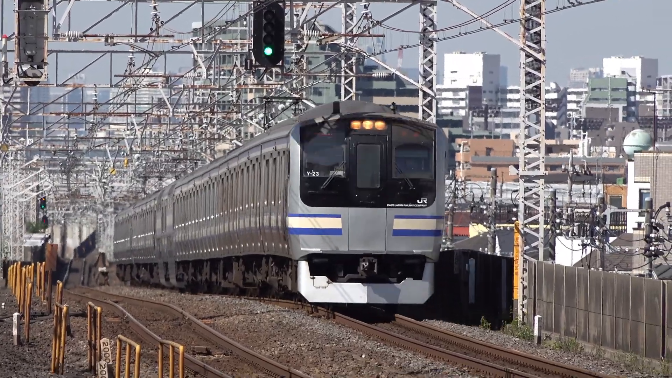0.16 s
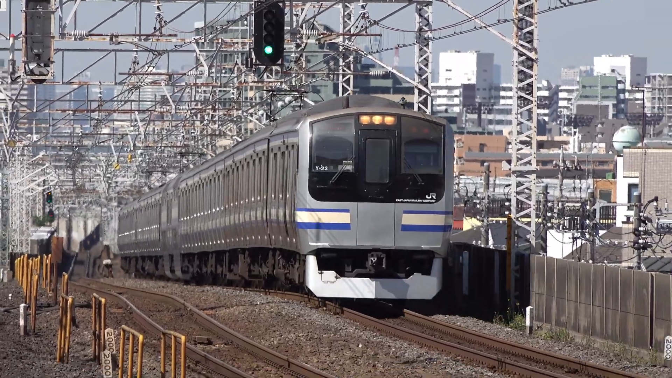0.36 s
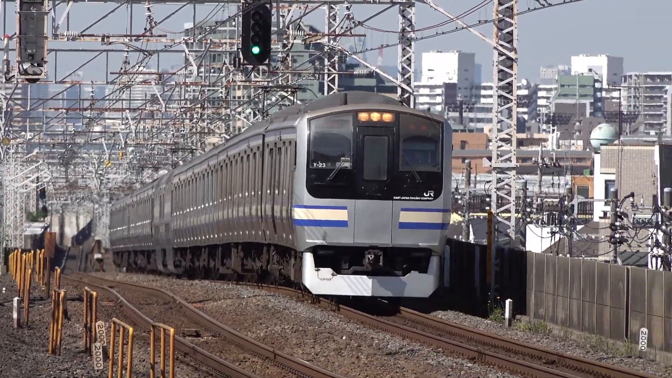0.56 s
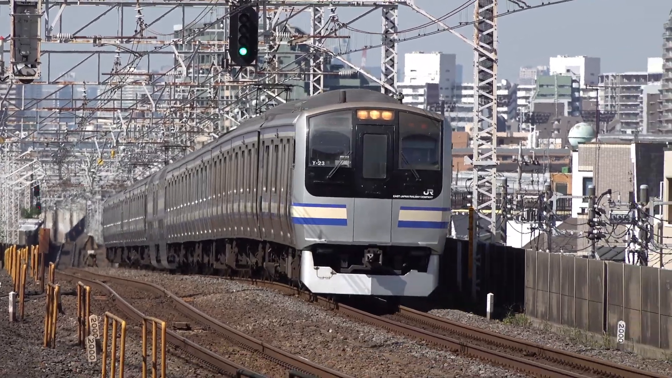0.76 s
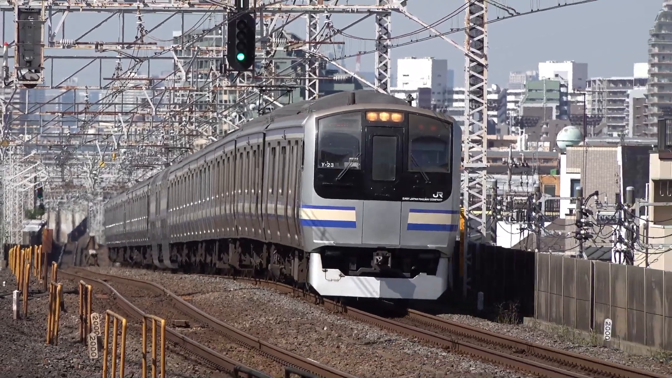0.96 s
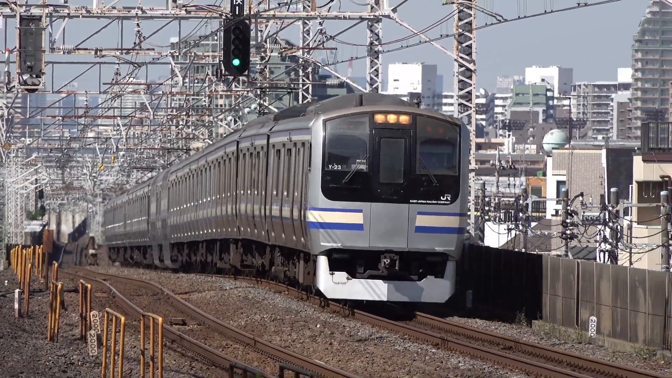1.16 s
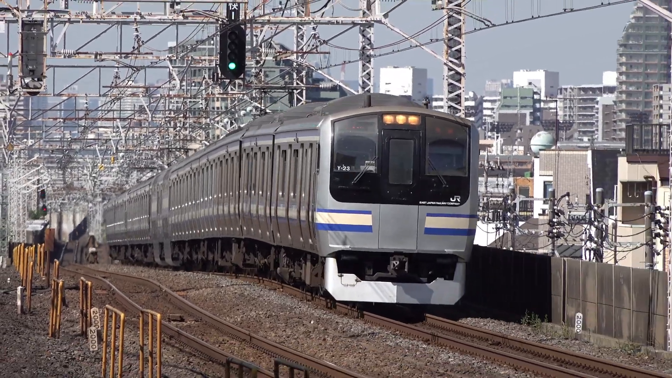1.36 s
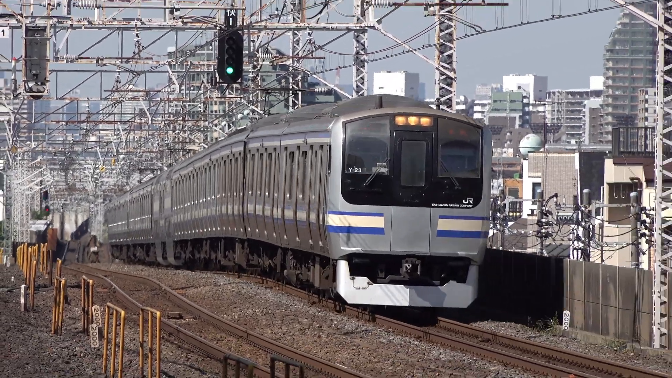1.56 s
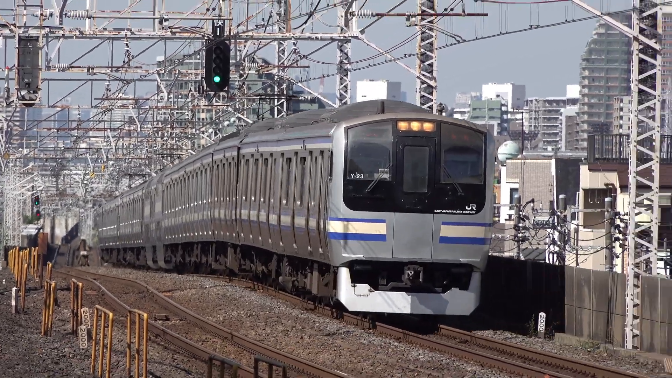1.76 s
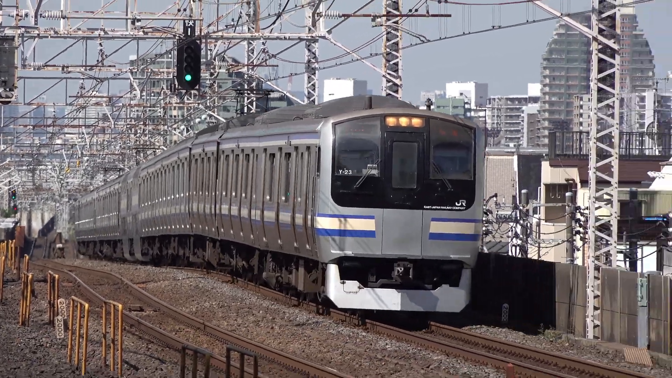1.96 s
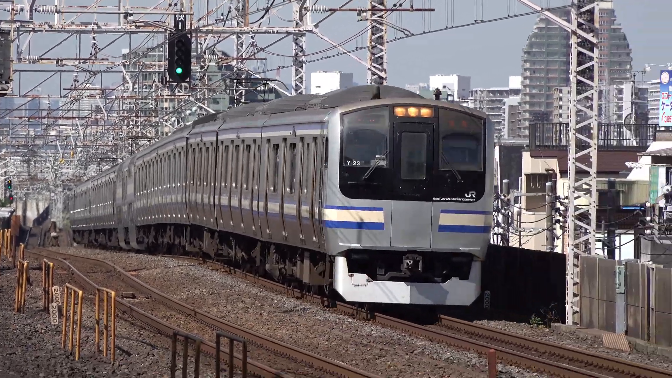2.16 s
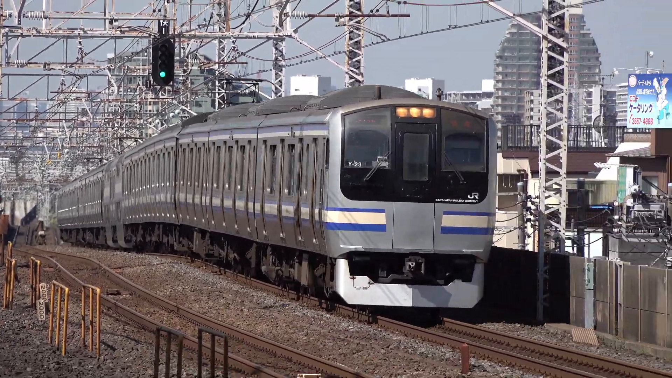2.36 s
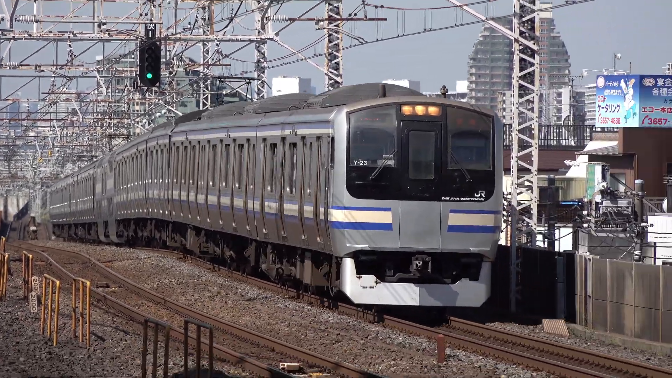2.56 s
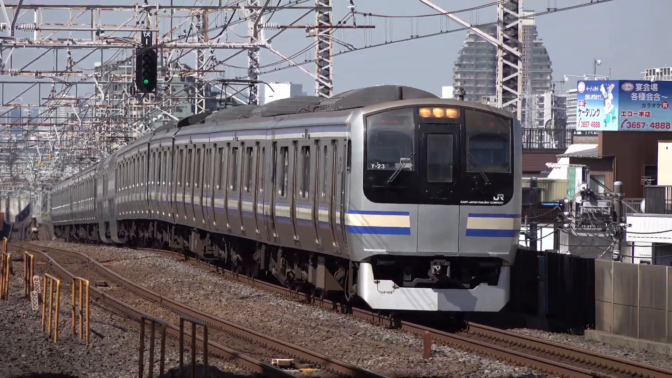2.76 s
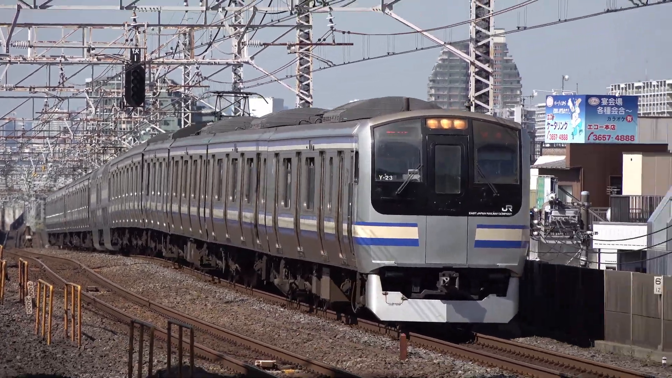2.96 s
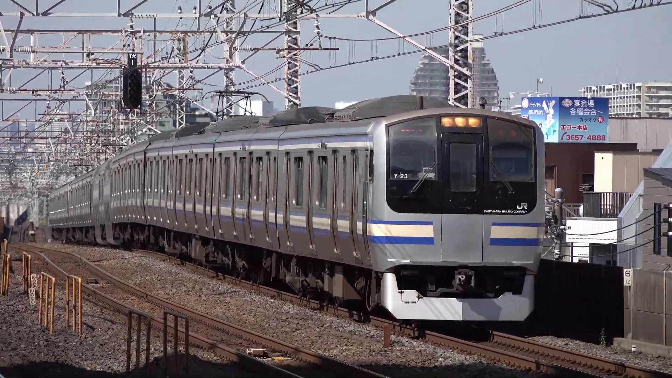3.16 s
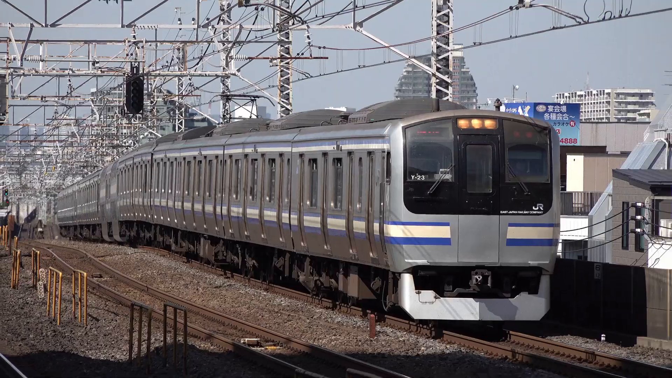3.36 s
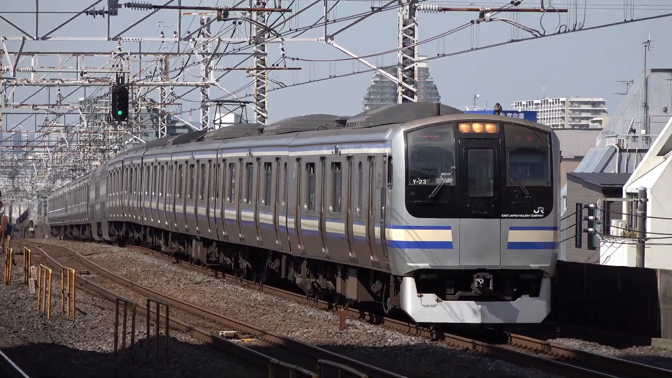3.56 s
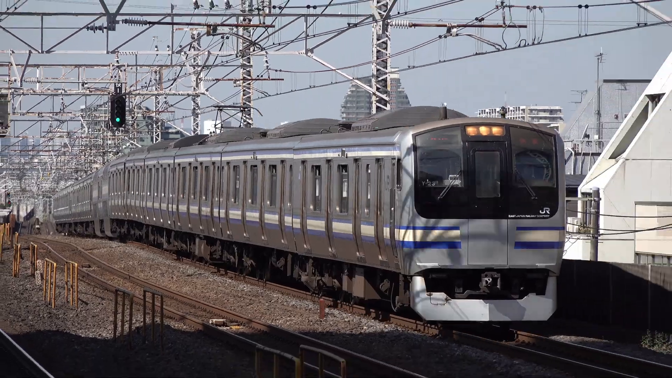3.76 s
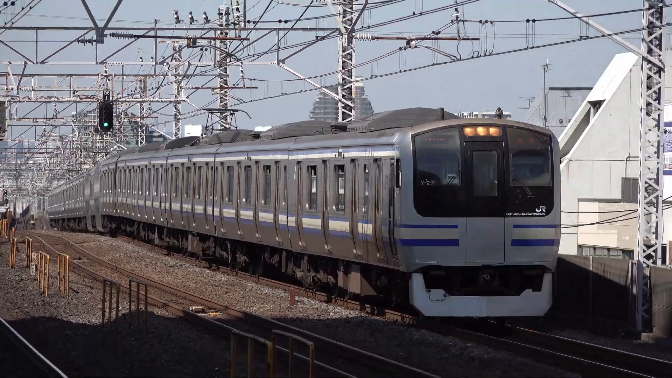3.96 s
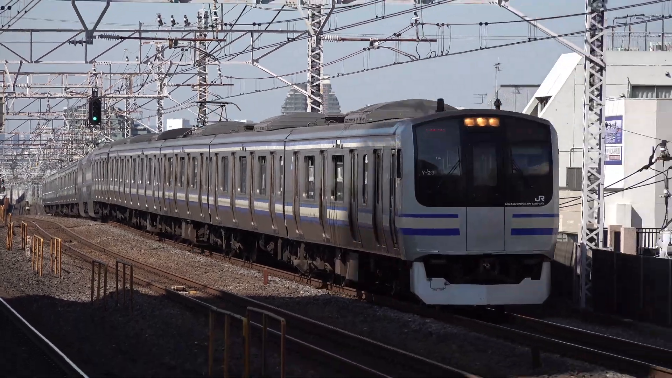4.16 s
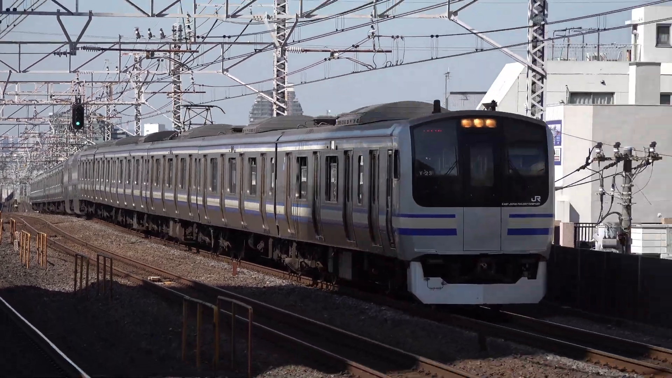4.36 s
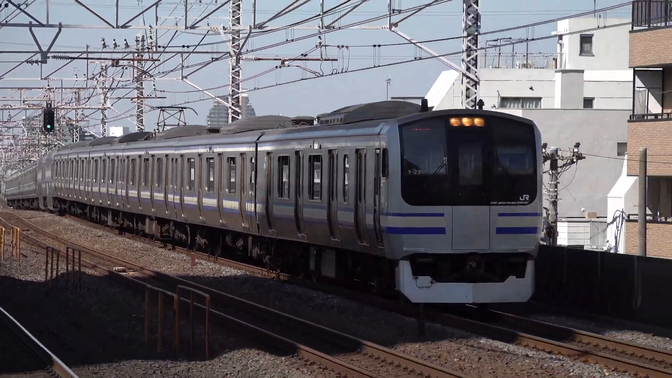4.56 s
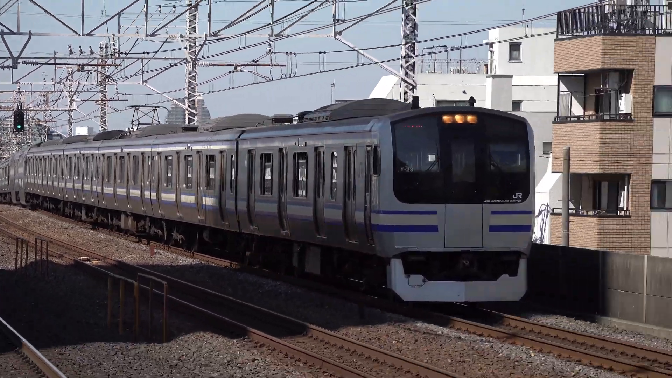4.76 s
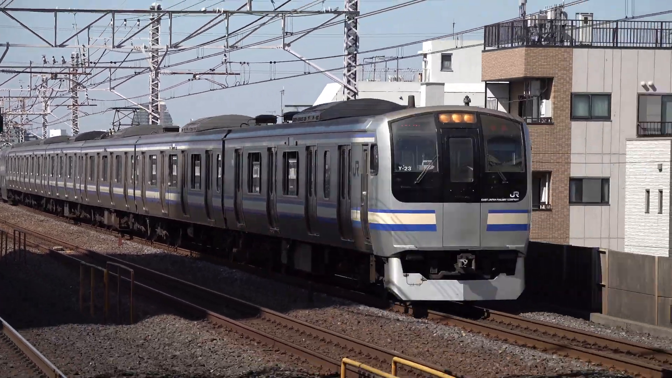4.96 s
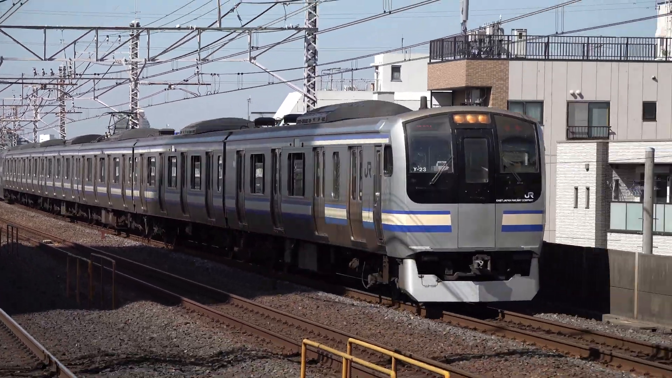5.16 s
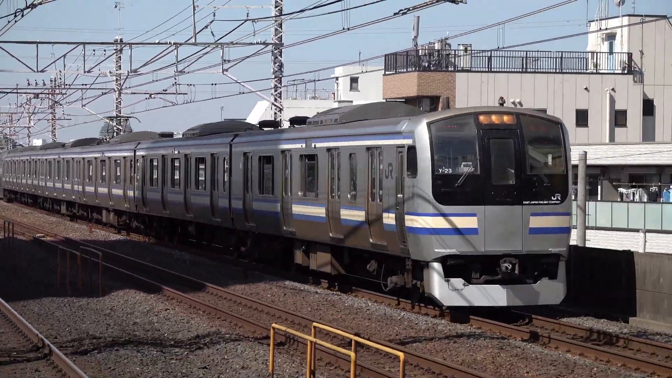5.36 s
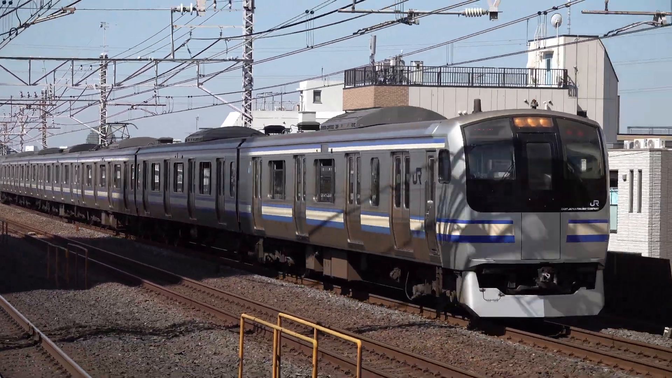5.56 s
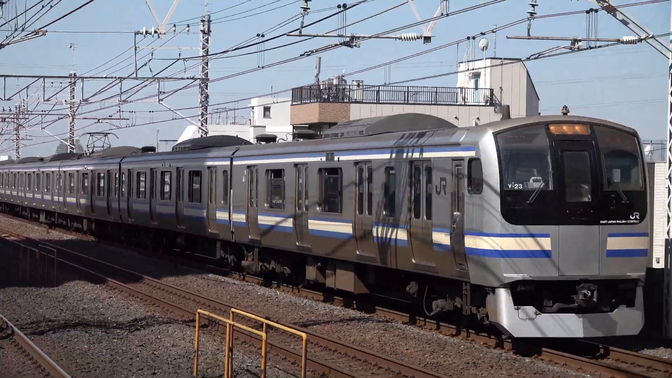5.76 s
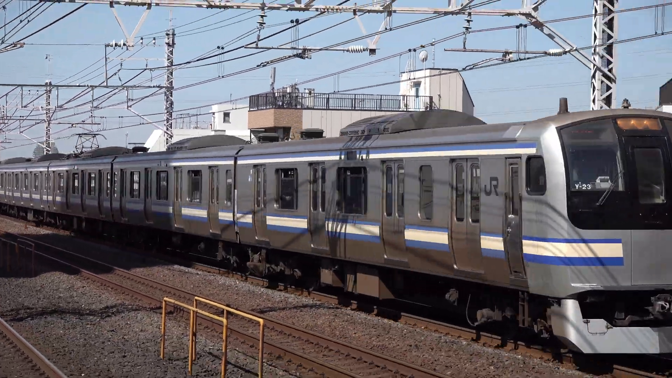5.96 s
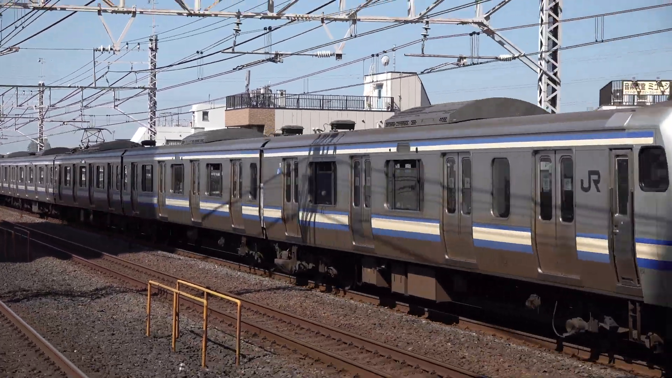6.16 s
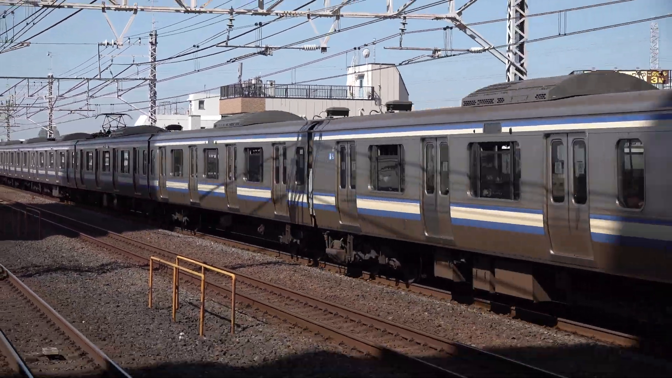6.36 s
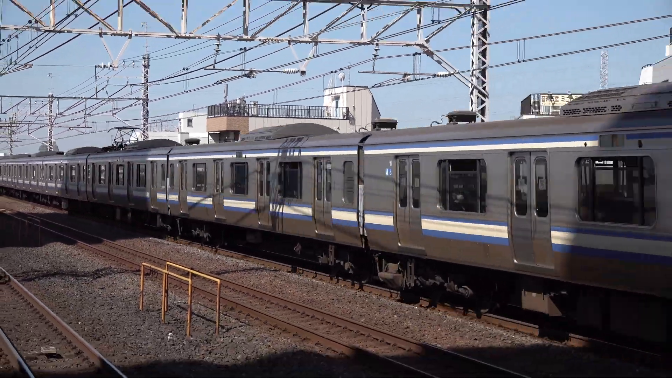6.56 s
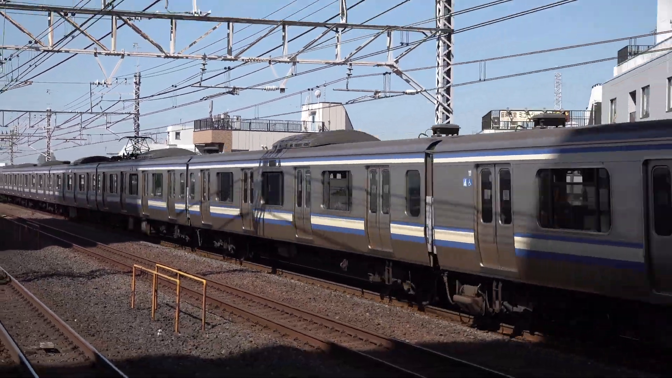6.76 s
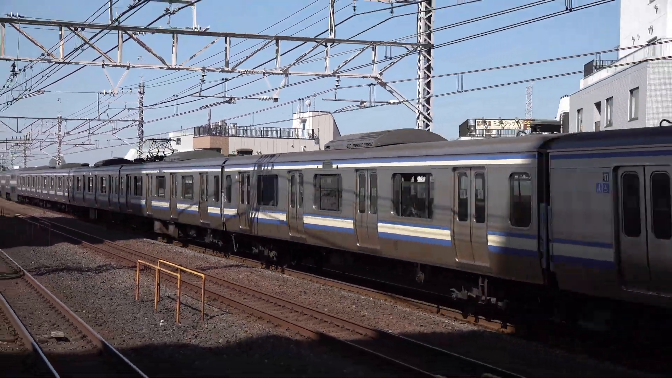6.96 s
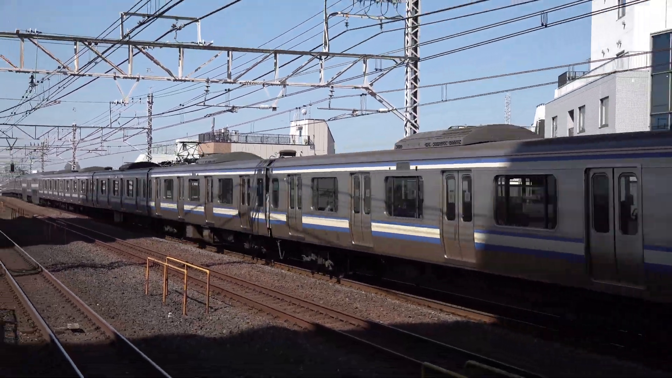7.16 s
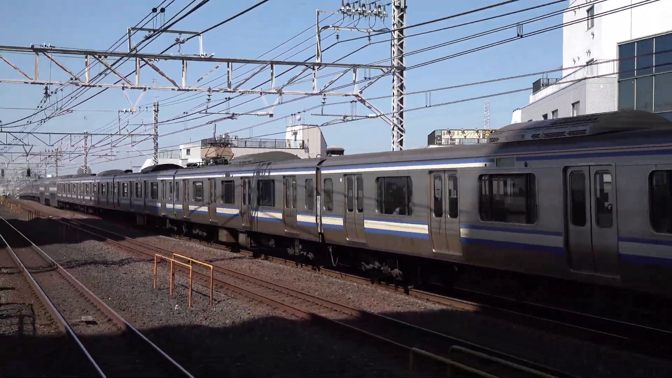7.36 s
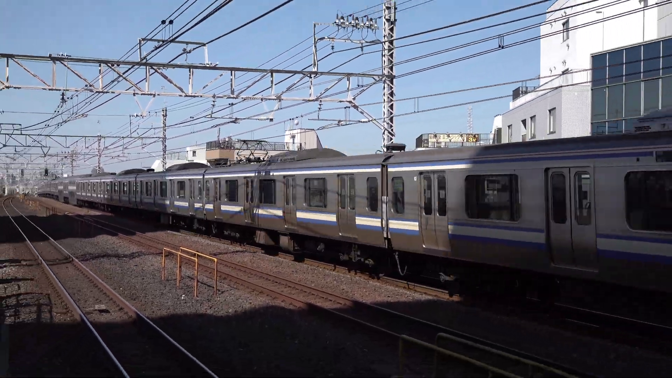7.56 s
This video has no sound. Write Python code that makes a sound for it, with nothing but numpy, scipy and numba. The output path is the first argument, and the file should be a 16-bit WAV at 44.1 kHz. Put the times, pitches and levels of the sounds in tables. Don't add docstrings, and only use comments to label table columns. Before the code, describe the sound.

In the open air beside a railway, low town rumble, a faint machine hum and distant rail singing begin quietly, with tiny bright taps around 0.5 seconds and a soft low knock at 1.3. Near 1.9 seconds a close camera starts a sharp, metallic burst, about seven clacks a second, lasting until roughly 3.35. From 2.7 to 3.5 a duller camera clatters faster, about twelve a second, overlapping it. Low bumps on the platform cluster around 3.3 to 3.5. With the shutters silent, the approaching electric train grows through 4 to 6 seconds, wheels ringing tonally above rolling roar and hiss. Around 6.7 its nose passes with a deep swell of air, and the ringing slides downward as successive bogies pass. It stays loud and close, leaning right, until the end at about 7.7.

```python
import sys
import numpy as np
from scipy import signal
from scipy.io import wavfile
from numba import njit

SR = 44100
rng = np.random.default_rng(int(sys.argv[2]) if len(sys.argv) > 2 else 0)


def volts(x):
    e = np.asarray(x, float) / 20
    return 10 ** e


def wav_out(sig):
    wavfile.write(sys.argv[1], SR, np.round(np.clip(np.atleast_2d(sig).T, -1, 1) * 32767).astype(np.int16))


N = 339129
TIME = np.arange(N) / SR
SLOW = TIME[::32]
STRIKE = np.arange(1200) / SR


def full(slow):
    return np.interp(TIME, SLOW, slow)


def walk(rate):
    return np.interp(SLOW * rate, np.arange(4000), rng.standard_normal(4000))


def read(table, hz):
    table = np.array(table)
    return np.interp(np.log(hz), np.log(table[:, 0]), table[:, 1])


def crossfade(hz, edges_hz, values):
    return np.interp(np.log(hz), np.log(edges_hz), values)


@njit
def svf(x, hz, width):
    y, b, l = np.empty(len(x)), 0., 0.
    g, k = np.tan(np.pi * hz / SR), width / hz
    for i in range(len(x)):
        v = (b + g * (x[i] - l)) / (1 + g * (g + k))
        b, l, y[i] = 2 * v - b, l + 2 * g * v, k * v
    return y


def band(x, hz, width):
    hz, width = float(hz), float(width)
    return svf(svf(x, hz, width), hz, width)


# time in seconds, nearness in dB below the level alongside,
# depth of the long ripples under it in dB, left minus right in dB.
APPROACH_PATH = [(0.0, -37, 16, 1), (0.9, -30, -7, 1), (1.8, -28, 1.5, 1), (2.7, -24.5, 1, 1.5),
                 (3.6, -20, -4.5, .5), (4.2, -17.5, -3.5, .4), (4.7, -15, -4.5, 0.5),
                 (5.1, -12.5, 2.5, 0.7), (5.5, -11, 5.5, 0.5), (6.0, -8, 3.5, 0.5), (6.35, -3.5, -5, -.3),
                 (6.55, -2.5, -1.5, -1), (6.7, -2.5, 6, -2.5), (6.9, -1, -2.5, -2.5),
                 (7.15, -0.1, -3, -2.6), (7.33, -0.8, 2, -2.5), (7.5, -0.5, 1, -2), (7.69, -1.5, 1, -3)]


def approach():
    s, *columns = np.transpose(APPROACH_PATH)
    return [np.interp(SLOW, s, column) for column in columns]


def law(rule):
    return rule[0] + rule[1] * approach()[0]


def nose():
    peak_s, rise_s, fall_s = 6.7, 0.57, 0.32
    late = SLOW - peak_s
    return np.exp(-(late / np.where(late < 0, rise_s, fall_s)) ** 2)


# frequency in Hz, correlation of left and right from 0 to 1.
LIKENESS = [(30, .97), (110, 0.94), (250, 0.89), (700, 0.91), (1400, 0.82), (3000, 0.81), (5000, 0.95),
            (8000, 0.041), (11000, 0.28), (15000, 0.71)]


def side_gain(hz):
    alike = np.clip(read(LIKENESS, hz), 0, 1)
    return np.sqrt((1 - alike) / (1 + alike))


def bass_spread(share):
    far_db, opens_s, open_s = -20.5, 6.32, 0.14
    return full(volts(share * far_db / (1 + np.exp((SLOW - opens_s) / open_s))))


def add(x, s, db, ring_ms, chatter):
    i = int(s * SR)
    decay = np.exp(-STRIKE * 1000 * np.log(1000) / ring_ms)
    rise = 1 - np.exp(-STRIKE / .0004)
    x[i:i + len(STRIKE)] += volts(db) * decay * rise * chatter


def body(x, modes):
    return sum(volts(db) * band(x, hz, 1.27 * width) for hz, width, db in modes)


def beside(x, pan_db, lag_ms, wet_db):
    tail = rng.standard_normal((2, len(STRIKE))) * np.exp(-STRIKE / 0.0067)
    wet = signal.fftconvolve(x[None], tail, axes=1)[:, :N]
    late = np.interp(TIME - lag_ms / 1000, TIME, x)
    direct = np.array([x * volts(pan_db / 2), late * volts(-pan_db / 2)])
    return direct + volts(wet_db) * wet


# frequency in Hz, width in Hz, level in dB.
MACHINE_HUM = (343, 2.4, -54.5)


def town_hum():
    hz, width, db = MACHINE_HUM
    hum = svf(rng.standard_normal(N), float(hz), float(width))
    return volts(db) * hum / np.std(hum)


def wind():
    puff, stray = (band(rng.standard_normal(N), 44, 33) for _ in range(2))
    difference = .13 * bass_spread(1) * stray * np.array([[1], [-1]])
    gust_db = 2.5 * walk(7)
    level_db = law((-41, 0.18)) + 9 * nose() + gust_db
    return (puff + difference) / np.std(puff) * full(volts(level_db))


# frequency in Hz, density in dB per Hz.
TOWN_SPECTRUM = [(22, -3), (50, -4.5), (76, -10.5), (109, -8.5), (164, -13), (345, -14), (1190, -19.5),
                 (1610, -24), (3000, -33), (4800, -39.5), (5800, -126), (7000, -79), (11000, -54),
                 (15800, -61)]
# frequency in Hz, density in dB per Hz.
ROLLING_SPECTRUM = [(25, -2), (60, -5.5), (200, -7.5), (450, -10.5), (700, -16), (1000, -15.5),
                    (1700, -17.5), (2500, -16.5), (3300, -22.5), (4500, -12), (6000, -27.5), (9500, -35),
                    (11000, -76), (15800, -68)]


def roar():
    roll_db, hiss_db = law((-47.5, 0.78)), law((-49.5, 1.535))
    rumble_db = law((-52, 0.92)) + 4 * nose()
    pan_db = approach()[-1]
    centres = 25 * 2 ** (np.arange(29) / 3)
    bandwidth_db = 10 * np.log10(centres)
    town = volts(read(TOWN_SPECTRUM, centres) + bandwidth_db)
    rolling = volts(read(ROLLING_SPECTRUM, centres) + bandwidth_db)
    town *= volts(-37) / np.linalg.norm(town)
    noise = rng.standard_normal((3, 2, N))
    out = np.zeros((2, N))
    for k, hz in enumerate(centres):
        mid, side = (band(x, hz, .36 * hz) for x in noise[k % 3])
        low = crossfade(hz, [300, 900], [1, 0])
        high = crossfade(hz, [1500, 8000], [0, 1])
        swell_db = low * rumble_db + high * hiss_db + (1 - low - high) * roll_db
        flicker = volts(1.5 * walk(9))
        size = np.hypot(town[k], rolling[k] * volts(swell_db)) * flicker / np.std(mid)
        side *= side_gain(hz) * bass_spread(crossfade(hz, [100, 700], [1, 0]))
        lean = volts((1 - low) * pan_db / 2)
        out[0] += full(size * lean) * (mid + side)
        out[1] += full(size / lean) * (mid - side)
    return out


# start in seconds, level in dB, frequency in Hz, ring in ms.
BUMPS = [
    (.49, -52, 5600, 25),
    (.62, -58, 9600, 25),
    (1.3, -40, 1270, 200),
    (3.295, -30, 1190, 150),
    (3.32, -37, 1330, 110),
    (3.371, -35, 1250, 170),
    (3.40, -36, 1500, 60),
    (3.47, -38, 1880, 46),
]


def knocks():
    out = np.zeros(N)
    for s, db, hz, ring_ms in BUMPS:
        push = np.zeros(SR // 4)
        add(push, 0, db + 21, ring_ms, rng.standard_normal(len(STRIKE)))
        out[int(s * SR):][:len(push)] += body(push, [(hz, 0.13 * hz, 0)])
    return beside(out, 2.1, .05, -53)


DULL_FRAMES_DB = [-26, -26.5, -27.5, -23.5, -27, -26.5, -27, -27, -25.5, -25.5]
# start in seconds, peak level in dB.
DULL_PRESSES = [
    (2.653, -42),
    (3.5084, -41),
]
# lateness in ms, level in dB.
DULL_STRIKES = [
    (-8, -3),
    (0.5, 2.5),
    (5.5, -6),
    (20.5, -2.5),
    (27, -11),
]
# frequency in Hz, width in Hz, level in dB.
DULL_MODES = [(1250, 140, -0.5), (1720, 520, 0), (2400, 450, -1.5), (2900, 1300, -17), (3500, 210, -6.5),
              (4870, 570, -31), (6070, 720, -5.5), (6470, 490, -12)]


def dull_camera():
    push = np.zeros(N)
    first_s, every_s, ring_ms = 2.7364, .08118, 12.4
    frames_s = first_s + every_s * np.arange(len(DULL_FRAMES_DB))
    for s, peak_db in [*zip(frames_s, DULL_FRAMES_DB), *DULL_PRESSES]:
        for late_ms, db in DULL_STRIKES:
            add(push, s + late_ms / 1000, peak_db + db, ring_ms, rng.standard_normal(len(STRIKE)))
    return beside(volts(14) * body(push, DULL_MODES), 2.5, 0.032, -22)


# ms from the slap, level in dB, brightness in dB, ring in ms.
SHARP_STRIKES = [(-41.5, -10, -3, 3.5), (-21, -5.5, -4, 3.5), (-15, -4, -8, 3.9), (-17, -10, -4, 3.5),
                 (-4, -5, -4, 2.9), (0.56, 3, 2, 5.04), (9.5, -7, 4, 4.1), (30, -29, 12, 2.5),
                 (28.5, 1, 2, 3.4), (38.5, -9, 4, 5), (47.5, -8, -9, 4.6), (53.5, -6, -5, 5.4),
                 (56.5, -10, -8, 5.5)]
# ms from the slap, level in dB, ring in ms.
MIRROR_STRIKES = [
    (29.3, -7.5, 17),
    (37.4, -8, 16),
]
# ms from the slap, level in dB.
GEAR_RATTLE = [(-67, -50), (-50, -23), (-27, -23), (-2, -38), (-3, -19.5), (26, -27), (37.5, -19.5),
               (73, -26.5), (83, -57)]
# start in seconds, peak level in dB.
SHARP_START = [
    (1.9071, -37),
    (1.921, -32),
]
# frequency in Hz, width in Hz, level in dB.
SHARP_MODES = [(1910, 860, -4), (2700, 1470, -8), (4300, 420, -2.5), (4676, 620, 2), (5330, 400, 0)]
# frequency in Hz, width in Hz, level in dB.
METAL_MODES = [(5860, 710, -4), (8070, 3400, -15.5), (10440, 6300, -21), (12700, 4700, -24),
               (14900, 5200, -22)]
# frequency in Hz, width in Hz, level in dB.
MIRROR_MODES = [(4060, 340, 1), (8800, 1040, -14.5)]


def sharp_camera():
    push, edge, mirror, rattle = np.zeros((4, N))
    first_s, every_s, frames, peak_db = 1.9777, .14292, 10, -20.7
    rattle_ms, rattle_db = np.transpose(GEAR_RATTLE)
    habit = rng.standard_normal((len(SHARP_STRIKES), len(STRIKE)))
    habit[:, 14] += 5.9
    for s in first_s + every_s * np.arange(frames):
        for (late_ms, db, bright_db, ring_ms), chatter in zip(SHARP_STRIKES, habit):
            at = s + late_ms * (1 + .02 * rng.standard_normal()) / 1000
            chatter = chatter + .5 * rng.standard_normal(len(STRIKE))
            add(push, at, peak_db + db, ring_ms, chatter)
            add(edge, at, peak_db + db + bright_db, ring_ms, chatter)
        for (late_ms, db, ring_ms), chatter in zip(MIRROR_STRIKES, habit):
            chatter = chatter + .9 * rng.standard_normal(len(STRIKE))
            add(mirror, s + late_ms / 1000, peak_db + db, ring_ms, chatter)
        start_s = max(s - .09, SHARP_START[1][0])
        near = slice(int(start_s * SR), int((s + .09) * SR))
        rattle[near] += volts(peak_db + np.interp((TIME[near] - s) * 1000, rattle_ms, rattle_db, -99, -99))
    for s, start_db in SHARP_START:
        add(push, s, start_db, 5, habit[0])
        add(edge, s, start_db + 8, 5, habit[0])
    rattle *= full(volts(2.1 * walk(400))) * rng.standard_normal(N)
    sound = body(push + rattle, SHARP_MODES) + body(edge + rattle, METAL_MODES) + body(mirror, MIRROR_MODES)
    return beside(volts(13) * sound, 5.6, 0.025, -30.5)


@njit
def add_unsteady(out, hz, left, right, chance, step, scatter):
    turn, spin = 1 + 0j, 1 + 0j
    for i in range(out.shape[1]):
        if i % 32 == 0:
            turn, spin = turn / abs(turn), np.exp(2j * np.pi * hz[i // 32] / SR)
        turn *= spin
        k = int(i * step)
        u = i * step - k
        direct = ((chance[k, 0] + u * (chance[k + 1, 0] - chance[k, 0])) * turn).real
        side = scatter * ((chance[k, 1] + u * (chance[k + 1, 1] - chance[k, 1])) * turn).real
        out[0, i] += left[i // 32] * (direct + side)
        out[1, i] += right[i // 32] * (direct - side)


BOGIES = [3, 17, 23, 37, 43]
# multiple of the ripple rate, width in Hz, level in dB.
RIPPLE_ORDERS = [
    [(1, 37.92, -1), (1.02, 150.5, -1.5)],
    [(2.01, 59.83, -0.5), (2.04, 199.1, -5)],
    [(2.8, 129.9, -7), (3.0, 199.8, 0), (3.12, 149.9, -5.5)],
    [(4.1, 210, -2), (5.1, 298.4, -17), (6.2, 330.2, -3), (7.0, 423, -10), (8.0, 177.4, -19)],
]
# dB alongside, dB per dB of nearness, dB per dB of ripple depth.
ORDER_LAWS = [
    (-20, 1.24, 0.6),
    (-28, 0.87, 0.5),
    (-20.5, 1.17, 0.15),
    (-24, 1.2, 0.13),
]


def rail_song():
    ripple_hz, speed, level_s, aside_m = 686.1, 14, 6.72, 9
    along = speed * (SLOW - level_s) - np.array(BOGIES)[:, None]
    far = np.hypot(along, aside_m)
    bearing = along / far
    share = far ** -1.3
    share = share / np.linalg.norm(share, axis=0)
    heard_hz = ripple_hz / (1 + speed * bearing / 343)
    _, depth_db, pan_db = approach()
    lean_db = pan_db - 8.4 * (bearing - np.sum(share ** 2 * bearing, axis=0))
    out = np.zeros((2, N))
    for rule, orders in zip(ORDER_LAWS, RIPPLE_ORDERS):
        group_db = law(rule) + rule[2] * depth_db
        for multiple, width, db in orders:
            scatter = 0.81 * side_gain(multiple * ripple_hz)
            step = np.clip(width, 10, 700) / SR
            for hz, part, lean in zip(heard_hz, share, lean_db):
                chance = rng.standard_normal((6000, 4)).view(np.complex128)
                left = part * volts(group_db + db + lean / 2)
                right = part * volts(group_db + db - lean / 2)
                add_unsteady(out, multiple * hz, left, right, chance, step, scatter)
    return out


def scene():
    background = town_hum() + wind() + roar()
    platform = knocks() + dull_camera() + sharp_camera()
    return background + platform + rail_song()


def band_limit(x):
    return signal.sosfilt(signal.butter(12, 15990, fs=SR, output="sos"), x)


def record(dry):
    low_pass = signal.ellip(8, .2, 60, 15800, fs=SR, output="sos")
    finished = signal.sosfilt(low_pass, dry)
    return band_limit(finished)


dry = scene()
out = record(dry)
wav_out(out)
```